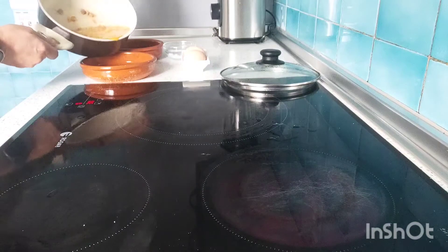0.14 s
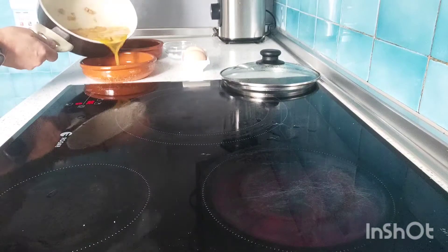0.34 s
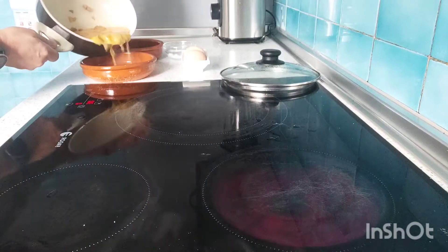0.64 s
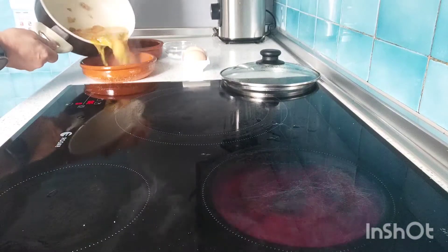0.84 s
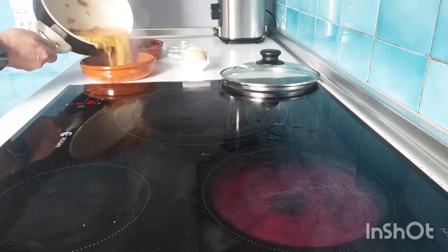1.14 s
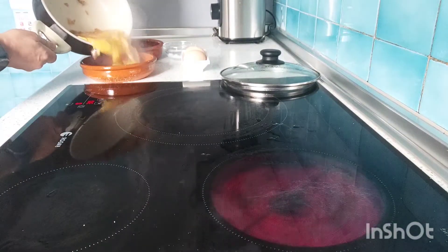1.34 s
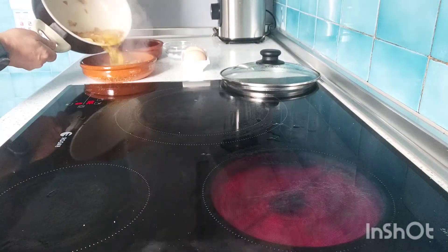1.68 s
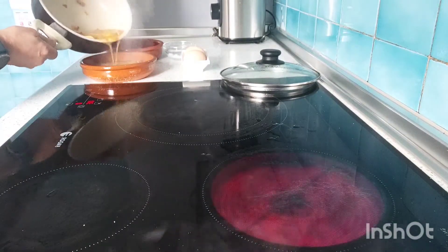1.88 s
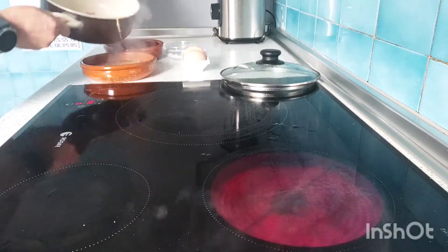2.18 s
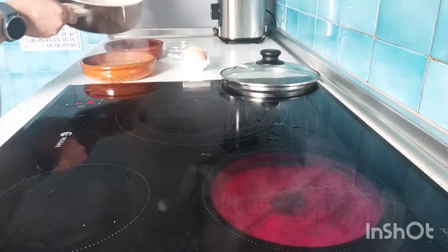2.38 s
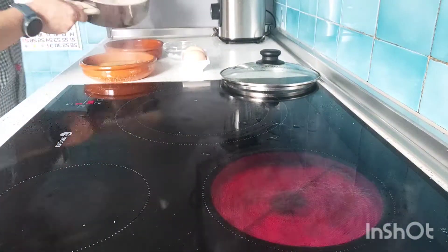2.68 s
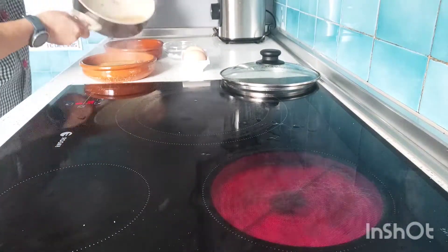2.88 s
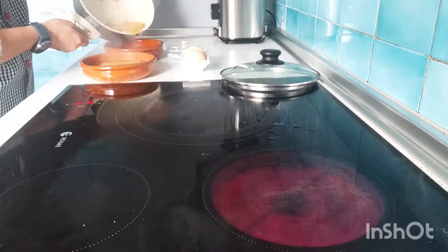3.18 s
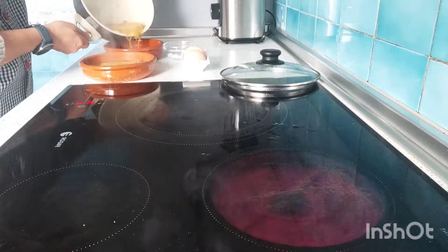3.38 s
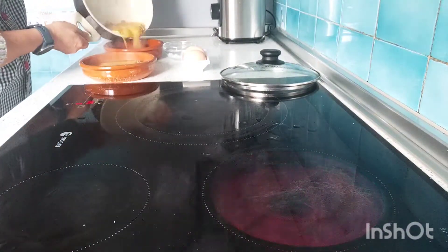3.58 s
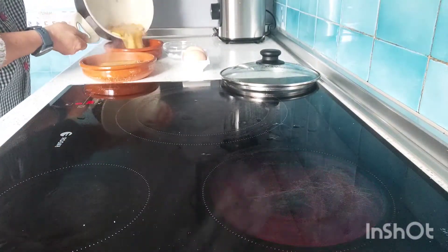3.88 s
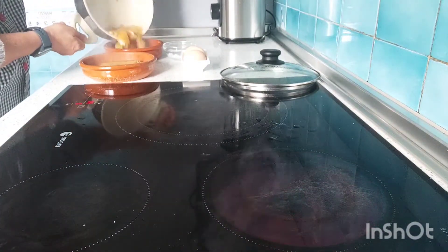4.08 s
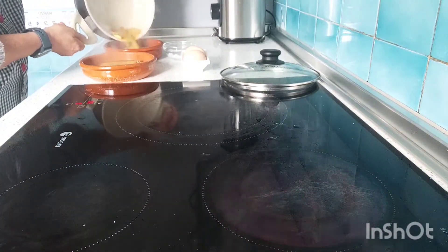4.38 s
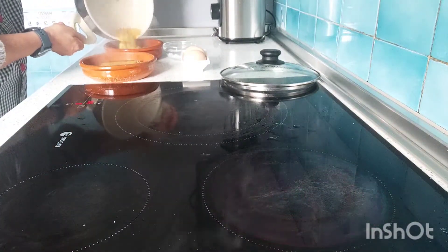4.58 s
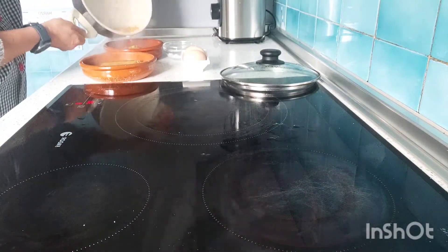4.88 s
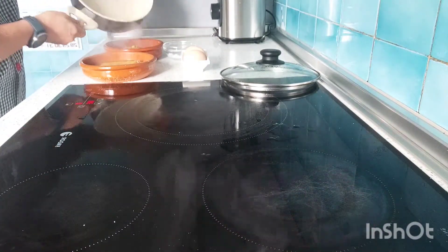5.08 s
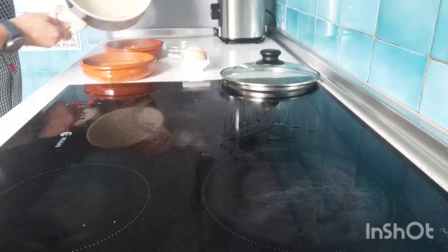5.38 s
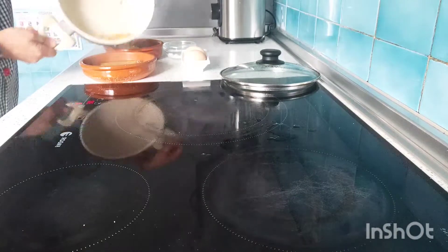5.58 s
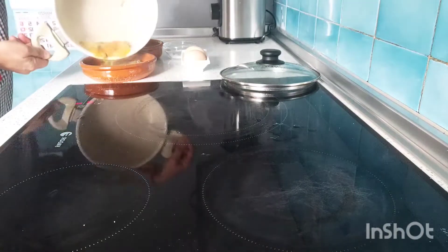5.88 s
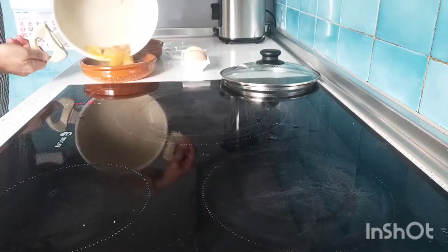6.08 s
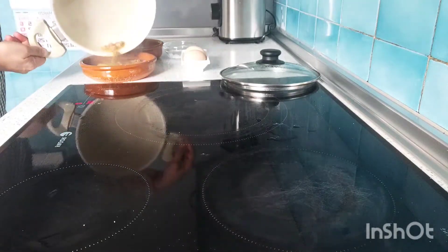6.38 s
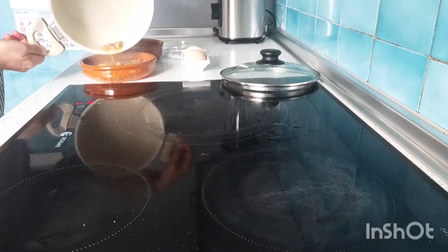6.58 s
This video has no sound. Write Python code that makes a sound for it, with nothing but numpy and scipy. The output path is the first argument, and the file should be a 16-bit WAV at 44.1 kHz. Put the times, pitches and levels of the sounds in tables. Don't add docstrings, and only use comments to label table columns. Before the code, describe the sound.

Clay dishes clunk against a pot as lumpy soup splatters in, pausing while fabric rustles, then pouring twice more over a faint refrigerator hum.

```python
import sys
import numpy as np
from scipy import signal
from scipy.fft import rfft, irfft, next_fast_len
from scipy.io import wavfile
from scipy.ndimage import uniform_filter1d, map_coordinates

SR = 44100
rng = np.random.default_rng(int(sys.argv[2]) if len(sys.argv) > 2 else 0)


def invert_db(x):
    u = np.asarray(x, float) / 20
    return 10 ** u


def transcribe(signal):
    frames = np.atleast_2d(signal).T
    limited = np.clip(frames, -1, 1)
    pcm = np.round(limited * 32767).astype(np.int16)
    wavfile.write(sys.argv[1], SR, pcm)


N = 297234
T = np.arange(N) / SR


def unit(x):
    return x / np.sqrt(np.mean(x ** 2) + 1e-20)


def along(points, hz):
    f, v = np.transpose(points)
    return np.interp(np.log(hz + 1), np.log(f + 1), v)


def wobble(rate):
    knots = rng.standard_normal(int(N * rate / SR) + 4)
    return map_coordinates(knots, [T * rate])


def filtered(x, response):
    m = next_fast_len(N + SR // 4)
    return irfft(rfft(x, m) * response(np.fft.rfftfreq(m, 1 / SR)), m)[..., :N]


def rush(spectrum, alike):
    def shape(hz):
        turn = np.arccos(np.clip(along(alike, hz), -1, 1)) / 2
        return invert_db(along(spectrum, hz)) * np.array([np.cos(turn), np.sin(turn)])

    mid, side = filtered(rng.standard_normal((2, N)), shape)
    return unit(np.array([mid + side, mid - side]))


def patchy(x, patchy_db):
    z = signal.stft(x, nperseg=512)[2]
    field = uniform_filter1d(rng.standard_normal(z.shape[1:]), 5, 0)
    field = uniform_filter1d(field, 5, 1)
    return unit(signal.istft(z * invert_db(patchy_db * unit(field)), nperseg=512)[1][:, :N])


def after(s, length):
    part = slice(int(s * SR) + 1, int((s + length) * SR))
    return part, T[part] - s


def ringing(modes, t):
    out = 0
    for k, (f, db, t60) in enumerate(modes):
        out = out + invert_db(db - 60 * t / t60) * np.sin(2 * np.pi * f * t) * (-1) ** k
    return out


# [f/Hz, rms level/dB]
MAINS_LINES = [(100, -70), (200, -69), (300, -78), (400, -72), (416, -76), (484, -79), (654, -86),
               (740, -88)]
# [f/Hz, density/dB per Hz]
RUMBLE = [(8.8, -25.5), (15, 5.5), (50, -9.5), (69, -8.5), (82, -9.5), (103, -12), (125, -15), (170, -12.5),
          (191, -4), (334, -9.5), (367, -16), (405, -9.5), (520, -19), (655, -19.5), (1500, -39),
          (1950, -78), (3300, -120)]
# [f/Hz, left-right likeness]
RUMBLE_ALIKE = [(60, -0.11), (180, 1), (550, -0.032), (1650, 0.55), (4970, -0.72), (15000, -0.43)]


def refrigerator():
    lines = 0
    for hz, db in MAINS_LINES:
        lines = lines + invert_db(db + 1.5 + 1.2 * wobble(5)) * np.sin(2 * np.pi * (hz * T + rng.random()))
    drift_db = 0.7 * np.sin(2 * np.pi * T / 5.0 + 1.8)
    return lines + invert_db(-63 + 1.5 + 0.79 * wobble(9) + drift_db) * rush(RUMBLE, RUMBLE_ALIKE)


BRUSHES = [(0.026, -55.5, -66, 0.1), (0.924, -64, -85, 0.09), (1.168, -66, -62, -0.03),
           (1.44, -63, -69.5, 0.16), (1.714, -59.5, -71, 0.04), (2.116, -49.5, -54.5, 0.0981),
           (2.38, -67, -77, 0.33), (2.51, -59.5, -69.5, 0.21), (2.645, -52, -59, 0.1125),
           (2.89, -55.5, -70, 0.13), (2.942, -49, -62.5, 0.0878), (3.5, -79, -94, 0.5),
           (3.84, -70.5, -79, -0.08), (4.07, -66, -100, 0.26), (4.33, -63, -92, -0.06),
           (4.6, -71.5, -92.5, 0.4), (5.469, -69, -80.5, 0.3), (6.07, -63.5, -72, 0.22),
           (6.168, -88, -91, 1.3), (6.61, -77.5, -99, -1)]


def swells(levels_db, shorter, rise, still_db):
    s, fade = np.transpose(BRUSHES)[[0, 3], :, None]
    u = (T[::64] - s) / (fade * shorter)
    drop_db = 10 * np.where(u < 0, -u / rise, u) ** 1.09
    power = (invert_db(levels_db[:, None] - drop_db) ** 2).sum(axis=0) + invert_db(still_db) ** 2
    return np.interp(T, T[::64], np.sqrt(power))


# [f/Hz, density/dB per Hz]
SLEEVE_HISS = [(2350, -20), (4000, -18), (6000, -13.5), (7840, -2), (8500, -7.5), (9280, -5.5),
               (10200, -23), (11400, -27), (14300, -34), (15700, -32)]
# [f/Hz, density/dB per Hz]
SLIPPER_SCUFF = [(410, -24), (900, -2), (1250, -10.5), (1550, 0), (2400, -2), (3100, -7.5), (5500, -20.5),
                 (7150, -44), (12100, -120)]


def rustle():
    hiss_db, scuff_db = np.transpose(BRUSHES)[1:3]
    mottle = invert_db(.8 * wobble(25) + 1.1 * wobble(400))
    hiss = swells(hiss_db, 1, 0.67, -91) * mottle
    scuff = swells(scuff_db, 0.84, 0.42, -84.5)
    sleeves = hiss * patchy(rush(SLEEVE_HISS, [(5000, 0)]), patchy_db=1.0)
    return sleeves + scuff * patchy(rush(SLIPPER_SCUFF, [(2000, -0.18)]), patchy_db=2.0)


# [t/s, ring level/dB, boom level/dB, boom f/Hz, lean of the boom's swell 0-1]
RIM_KNOCKS = [
    (0.159, -26.5, -29, 234, 0.23),
    (0.857, -31.5, -29.5, 225.5, 0.29),
    (1.3459, -49, -41.5, 212, 0.2),
    (2.3358, -78, -50.5, 247, 0.3),
    (3.2724, -26.5, -25, 205, 0.81),
    (3.733, -48, -38, 200, 1),
]
# [crack level/dB, grinding level/dB, boom delay/s, deepest cabinet modes level/dB]
RIM_CONTACTS = [
    (-4, -22, .0046, -0.3),
    (-6.5, -23, .0046, .1),
    (1, -16, 0.0016, 1),
    (-5.5, -24, 0.0017, -6),
    (-7, -15, .0036, 1),
    (-1, -23, 0.0004, 5),
]
# [f/Hz, level/dB, t60/s]
NEAR_MODES = [(408, 2.5, 0.036), (484, -6, 0.068), (963, 4.5, 0.056), (1050, 3, 0.043), (1136, 6.5, 0.053),
              (1790, 0.5, 0.019), (1996, -1, 0.024), (2034, -23, 0.053), (2903, -16, 0.0293),
              (2760, -28, 0.11), (1100, -16, 0.22), (1136, -23, 0.36), (1160, -16, 0.26), (1904, -29, 0.18)]
# [f/Hz, level/dB, t60/s]
FAR_MODES = [(394, 8.5, 0.041), (486, -11, 0.083), (653, -13, 0.13), (748, -7.5, 0.12), (976, -3, 0.043),
             (1126, 3.5, 0.084), (1307, 5, 0.045), (1417, -7, 0.052), (1670, -18, 0.084),
             (2160, -13.5, 0.098), (2335, -11, 0.059), (3610, -9.5, 0.022), (5330, -18, 0.021)]
# [f/Hz, level/dB, t60/s]
CABINET_MODES = [(122.75, -7.5, 0.38), (147.2, -0.5, 0.19), (190.4, -5, 0.16), (230, -5.5, 0.36),
                 (264.6, -4.5, 0.36), (313.7, -6, 0.2)]
# [f/Hz, density/dB per Hz]
CLAY_CRACK = [(200, -35), (500, -9.5), (1200, 10.5), (2200, -4), (3200, -16), (5500, -19), (8000, -9.5),
              (10000, -29), (12000, -83)]
# [f/Hz, density/dB per Hz]
RIM_GRIND = [(500, -30), (800, 1), (1300, 2.5), (2200, -2.5), (2900, -16.5), (4000, -30.5), (6000, -60)]


def knocks():
    far_from_s, boom_cycles = 2.2, 4.1
    ring, boom, crack, grind = np.zeros((4, N))
    for knock, contact in zip(RIM_KNOCKS, RIM_CONTACTS):
        s, ring_db, boom_db, hz, lean = knock
        crack_db, grind_db, late, deep_db = contact

        part, t = after(s, .3)
        onset = invert_db(ring_db) * (1 - np.exp(-(t / 0.0036) ** 2))
        soft = max(-30 - ring_db, 0)
        dish = FAR_MODES if s > far_from_s else NEAR_MODES
        struck = [(f, db - soft * max(np.log2(f / 900), 0), t60) for f, db, t60 in dish]
        ring[part] += onset * ringing(struck, t)
        crack_level_db = ring_db - 0.78 * soft + crack_db - 1.5
        crack[part] += invert_db(crack_level_db - 60 * t / 0.063) * (1 - np.exp(-t / 0.0014))
        grind[part] += onset * invert_db(grind_db - 60 * t / 0.2)

        part, t = after(s + late, boom_cycles / hz)
        u = t * hz / boom_cycles
        swell = np.abs(np.sin(np.pi * u)) ** 0.41 * (1 + (2 * lean - 1) * (2 * u - 1))
        boom[part] += invert_db(boom_db) * swell * np.sin(2 * np.pi * hz * t)

        part, t = after(s + 0.0036, .45)
        cabinet = [(f, db + deep_db * (f < 170), t60) for f, db, t60 in CABINET_MODES]
        boom[part] += invert_db(boom_db - 9) * ringing(cabinet, t) * (1 - np.exp(-(t / 0.0081) ** 2))
    chatter = .85 + .4 * wobble(200)
    cracks = crack * rush(CLAY_CRACK, [(300, 1.0), (1200, 0.022), (4000, -0.32)])
    return ring * chatter, boom, cracks + grind * rush(RIM_GRIND, [(1500, .1)])


# [t/s, peak level/dB, t60/s, body level/dB]
NEAR_LUMPS = [(0.387, -38, 0.037, -12), (.58, -63, 0.08, -16), (0.599, -53, 0.2, -8.5),
              (0.6385, -48.5, 0.07, -42), (.692, -56.5, 0.073, -7.5), (.7856, -63, 0.088, -10),
              (0.9054, -40, 0.041, -15), (.9635, -53, 0.06, -2.5), (1.0062, -54.5, 0.046, -13),
              (1.056, -53, 0.1, -4), (1.0904, -53.5, 0.26, -2.5), (1.13, -54, 0.047, -14),
              (1.1982, -55.5, 0.1, -7), (1.211, -47, 0.058, -18), (1.2877, -33.5, 0.064, -7),
              (1.329, -50, 0.08, -22), (1.3833, -41.5, 0.14, -8), (1.426, -50, 0.16, -4),
              (1.5126, -51.5, 0.2, -14), (1.598, -57, 0.174, -7), (1.6279, -42.5, 0.062, -6.5),
              (1.6937, -54, 0.079, 0.5), (1.795, -58, 0.27, -7), (1.893, -50.5, 0.051, -5.5),
              (1.9275, -57, 0.078, -6.5), (1.9868, -48, 0.05, -11)]
# [t/s, peak level/dB, t60/s, body level/dB]
FAR_LUMPS = [(3.4141, -66, .05, 3), (3.49, -65.5, 0.087, -4), (3.695, -71.5, 0.12, 3.5),
             (3.763, -54, 0.039, -11), (3.7998, -58, 0.067, -24), (3.819, -58, .054, -6),
             (3.88, -51, 0.13, -14), (3.9294, -61, 0.058, -6), (3.97, -57, .14, -10),
             (3.9998, -49.5, 0.11, -12), (4.0961, -73, 0.042, -5), (4.1213, -39.5, 0.13, -15),
             (4.2363, -49, 0.11, -11.5), (4.2533, -51.5, 0.13, -19), (4.3504, -54.5, 0.12, -10),
             (4.424, -56.5, 0.085, -12), (4.44, -51, 0.087, -22), (4.4665, -47.5, 0.05, 2.5),
             (4.499, -53, 0.128, -8), (4.524, -47.5, 0.042, -10), (4.683, -47, 0.055, -10),
             (4.6926, -41, 0.075, -12.5), (4.934, -64.5, 0.086, -36), (5.14, -50.5, 0.038, -28)]
# [t/s, peak level/dB, t60/s, body level/dB]
LAST_LUMPS = [(6.084, -55.5, 0.13, -9.5), (6.134, -56, 0.05, -5), (6.1853, -49.5, 0.038, -29),
              (6.27, -47, 0.081, -26.5), (6.3027, -52, 0.037, -0.5), (6.325, -51, 0.11, -35.5),
              (6.393, -51, 0.092, -11), (6.542, -52, .055, -3)]
# [t/s, mist level/dB]
BROTH = [(.4, 3.5), (.65, -7), (1.0, 1), (1.29, -4), (1.4, 5), (1.95, -1), (4.1, -2), (4.3, 3), (4.5, -3.5),
         (4.9, -1), (6.09, 8.5), (6.27, -17), (6.39, 5), (6.54, -7)]
# [f/Hz, density/dB per Hz]
BRIGHT_SPRAY = [(2650, -29.5), (4500, -34), (5510, -14), (7650, 5.5), (8070, 1.5), (9460, 0.5),
                (10500, -29.5), (13500, -36), (16000, -83)]


def splats():
    spray, body, mist = np.zeros((3, N))
    for s, db, t60, body_db in NEAR_LUMPS + FAR_LUMPS + LAST_LUMPS:
        part, t = after(s, .25)
        burst = invert_db(db - 2.0 - 60 * t / max(t60, .01)) * (1 - np.exp(-(t / 0.0034) ** 2))
        spray[part] += burst
        body[part] += burst * invert_db(body_db)
        mist_db = -17 - 0.23 * (db + 47)
        mist[part] += burst * invert_db(mist_db + np.interp(s, *np.transpose(BROTH)))
    droplets = invert_db(2.2 * wobble(700))
    wet = [(500, -27.0), (1500, -18), (3000, -17.5), (4500, -14.0), (6000, -14.5), (8000, -51)]
    fine = [(8000, -67), (10300, 4), (13000, -7.0), (15000, -6), (16500, -30)]
    bright = spray * patchy(droplets * rush(BRIGHT_SPRAY, [(5000, 0.07)]), patchy_db=-0.5)
    dull = body * patchy(droplets * rush(wet, [(3000, -0.068)]), patchy_db=1.2)
    return bright + dull + mist * unit(droplets * rush(fine, [(12000, 0.079)]))


# [t/s, peak level/dB, f/Hz,
# t60/s, pitch spread 0-1]
BUBBLES = [(1.091, -49, 1960, 0.11, 0.2), (1.288, -43.5, 2646, 0.054, 0.76),
           (1.387, -54.5, 1410, 0.04, 0.8), (1.422, -49, 1790, 0.048, 0.39), (1.695, -58, 2846, 0.12, 0.36),
           (1.801, -50, 2490, 0.031, 0.68), (1.897, -57, 1130, 0.02, 0.2), (2.098, -54, 2200, 0.14, 0.1),
           (2.104, -67, 1510, 0.078, 0.3), (2.632, -60.5, 1630, 0.17, 0.13),
           (4.125, -63, 1340, 0.042, 0.06), (4.24, -49.5, 1155, 0.058, 0.51),
           (4.471, -57, 1800, 0.043, 0.23), (4.683, -63, 1124, 0.054, 0.43),
           (6.062, -59.5, 1615, 0.042, 0.45), (6.133, -44, 1260, 0.056, 0.29),
           (6.136, -48.5, 1710, 0.043, 0.13), (6.15, -59.5, 1150, 0.17, 0.07),
           (6.304, -57, 1760, 0.039, 0.23), (6.389, -69, 1780, 0.04, 0.27)]
# [t/s, peak level/dB, f/Hz, t60/s, pitch spread 0-1]
SMALL_BUBBLES = [(1.02, -53.5, 4860, 0.031, 0.44), (1.199, -56.5, 3300, 0.021, 0.56),
                 (1.49, -45, 6600, 0.046, 0.48), (1.599, -58, 6500, 0.027, 0.55),
                 (1.61, -53.5, 4800, 0.025, 0.58), (3.8877, -56.5, 4700, 0.032, 0.71),
                 (4.443, -52, 5600, 0.027, 0.38), (4.4994, -42, 4380, 0.027, 0.24),
                 (6.542, -55, 4070, 0.03, 0.35), (6.303, -58, 3450, 0.026, 0.24),
                 (6.389, -62, 3100, 0.026, 0.49), (1.632, -54, 4100, 0.032, .15),
                 (1.7, -64, 3000, 0.049, .15), (1.7, -60, 7400, .04, .2), (1.515, -61, 6600, .04, .4)]


def plops():
    out, rasp = np.zeros((2, N))
    for s, db, hz, t60, spread in BUBBLES + SMALL_BUBBLES:
        part, t = after(s, .1)
        knots = rng.standard_normal((2, 500))
        place = [np.clip(t * hz * spread, 0, 498)]
        film = .5 + map_coordinates(knots[0], place) + 1j * map_coordinates(knots[1], place)
        fade = invert_db(db - 60 * t / max(t60, .005)) * (1 - np.exp(-t / 0.0018))
        out[part] += fade * np.imag(film * np.exp(2j * np.pi * hz * t * (.98 + t)))
        rasp[part] += fade * (hz < 3100)
    rough = [(500, -43), (1000, 13.0), (2000, -5.0), (3200, -10.0), (5000, -26)]
    return out, invert_db(-5.0) * rasp * rush(rough, [(1000, -0.16)])


# [t/s, level/dB, most shaken f/Hz]
SLIPS = [
    (2.923, -55.5, 763),
    (2.934, -51.5, 690),
    (2.944, -45.5, 477),
    (2.956, -56, 480),
    (2.968, -48.5, 300),
    (2.979, -69, 620),
    (2.997, -62, 260),
]
# [f/Hz, level/dB, t60/s]
SLIP_MODES = [(167, 11.5, 0.052), (269, 1.5, 0.15), (475, -1, 0.14), (663, 1, 0.086), (796, 0.5, 0.04),
              (1040, -1, .04)]


def drag():
    out = np.zeros(N)
    for s, db, hz in SLIPS:
        part, t = after(s, .12)
        near = [(f, level - 14 * abs(np.log2(f / hz)), t60) for f, level, t60 in SLIP_MODES]
        out[part] += invert_db(db) * ringing(near, t) * (1 - np.exp(-t / 0.0023))
    return out * invert_db(2.4 * wobble(120))


# [f/Hz, t60/s]
ROOM_DECAY = [(100, 0.48), (400, 0.54), (1200, 0.52), (3000, 0.76), (9000, 0.44)]
# [f/Hz, level/dB]
ROOM_SHARE = [(100, 0.5), (210, -10.5), (400, -3), (1200, -8.5), (3000, -7.5), (9000, -6.5)]
# [f/Hz, left-right likeness]
ROOM_ALIKE = [(100, 0.87), (300, 0.4), (700, 0.078), (1500, 0.019), (5000, 0.021)]


def kitchen(x):
    noise = rush([(100, 0)], ROOM_ALIKE)[:, :SR // 2]
    hz, t, z = signal.stft(noise, SR, nperseg=512)
    tail = signal.istft(z * invert_db(-60 * t / along(ROOM_DECAY, hz)[:, None]), SR, nperseg=512)[1]
    delayed = np.pad(x.mean(axis=0), (450, 0))[:N]
    wet = filtered(delayed, lambda f: invert_db(along(ROOM_SHARE, f)))
    return signal.oaconvolve(wet[None], tail / np.linalg.norm(tail[0]), axes=1)[:, :N]


def scene():
    background = refrigerator() + rustle()
    ring, boom, crack = knocks()
    splash = splats()
    bubbles, rasp = plops()
    soup, counter = rasp + splash, boom + drag()

    def lag(hz):
        seconds = 0.000567 / (1 + (845 / (hz + 1)) ** 8)
        return np.exp(2j * np.pi * hz * seconds * np.array([[.5], [-.5]]))

    walls = kitchen(invert_db(-7) * ring + invert_db(0.5) * crack + counter + invert_db(0.5) * soup + invert_db(-5.5) * bubbles)
    airborne = filtered(ring + bubbles, lag) * invert_db([[-1.2], [1.2]])
    return airborne + soup * invert_db([[-.8], [.8]]) + crack + counter + walls + background


def band_limit(x):
    return signal.sosfilt(signal.butter(12, 16150, fs=SR, output="sos"), x)


# [f/Hz, left-right level/dB]
PORT_COLOUR = [(60, 5.5), (110, 4), (200, 7.5), (380, 6.5), (700, 6), (1290, 3), (2380, 0.1), (4400, -4.5),
               (8120, -4), (15000, 12)]
# [f/Hz, density/dB per Hz]
MIC_HISS = [(530, -42), (900, -3.5), (1190, -5.5), (1510, -15.5), (1600, -9), (2300, -23), (2500, -16.5),
            (3860, -14.5), (12100, -25.5), (13300, -33), (14300, -60)]


def record(dry):
    def ports(hz):
        return invert_db(along(PORT_COLOUR, hz) * np.array([[.5], [-.5]])) * (hz < 16150)

    hiss = invert_db(-80.5) * rush(MIC_HISS, [(1000, 0)])
    return band_limit(filtered(dry + hiss, ports))


dry = scene()
out = record(dry)
transcribe(out)
```